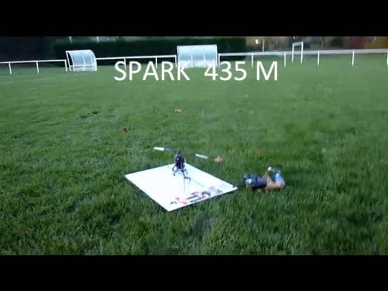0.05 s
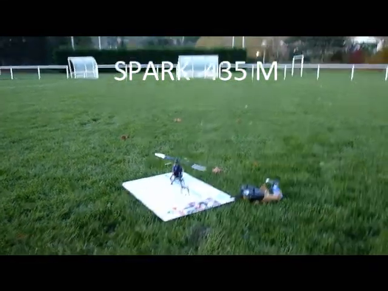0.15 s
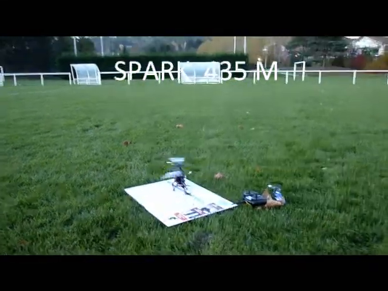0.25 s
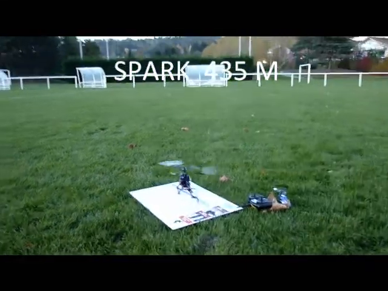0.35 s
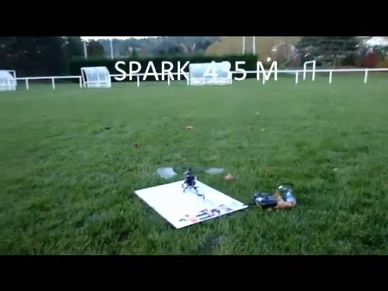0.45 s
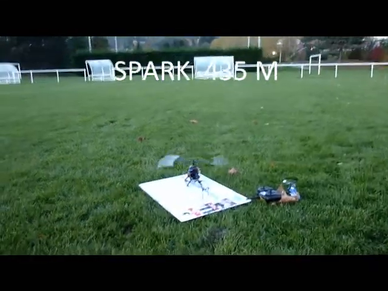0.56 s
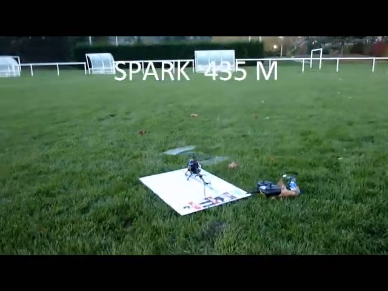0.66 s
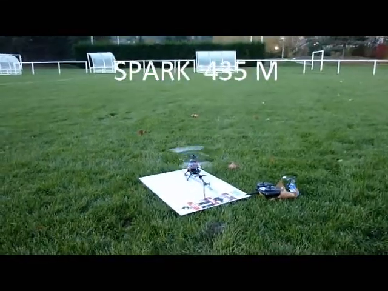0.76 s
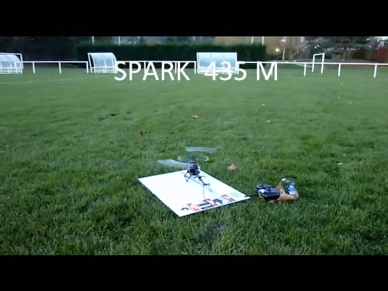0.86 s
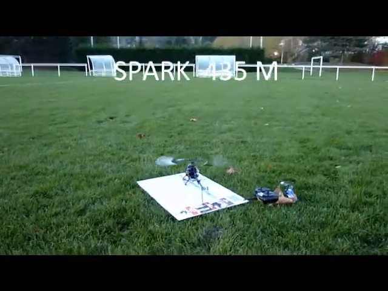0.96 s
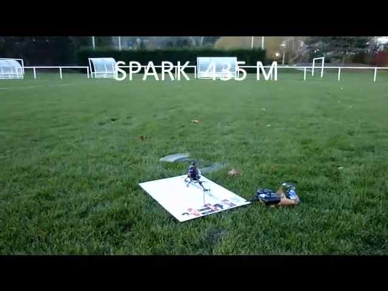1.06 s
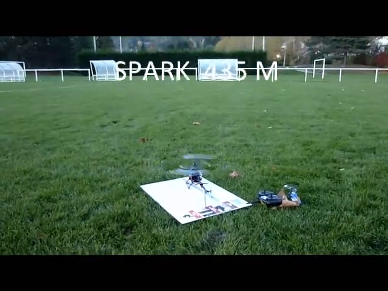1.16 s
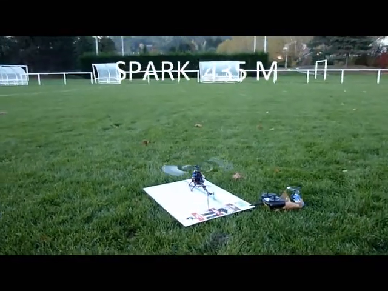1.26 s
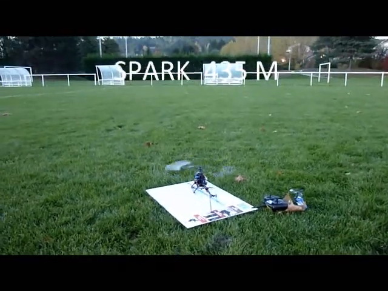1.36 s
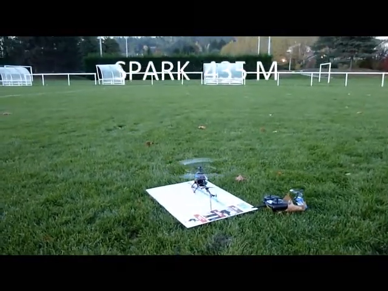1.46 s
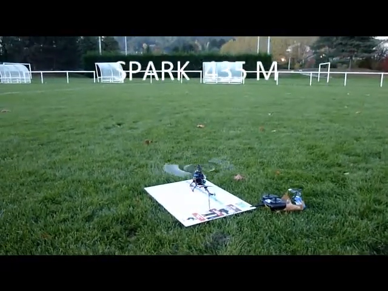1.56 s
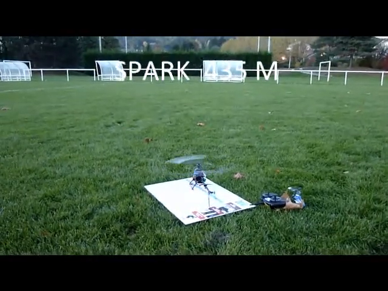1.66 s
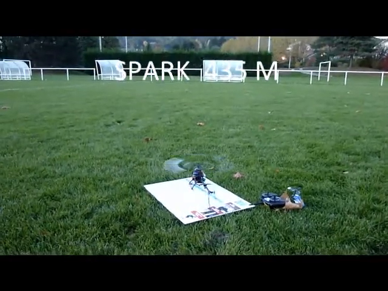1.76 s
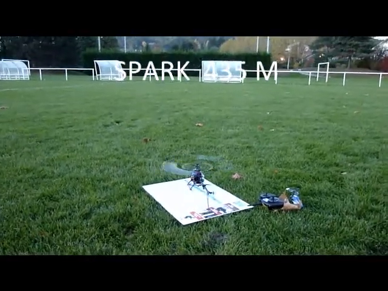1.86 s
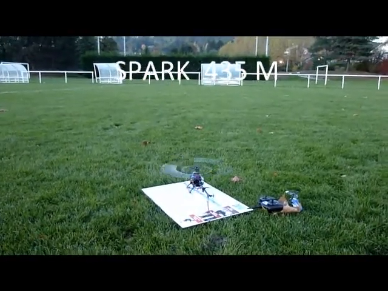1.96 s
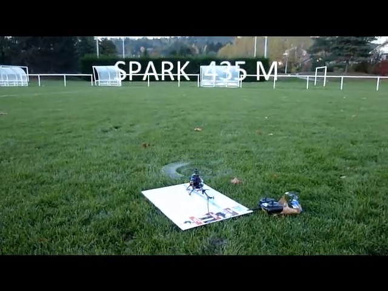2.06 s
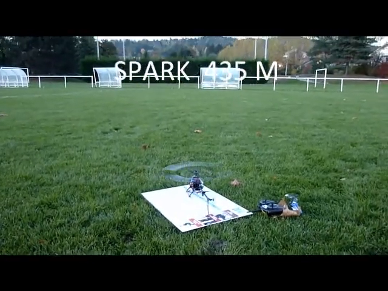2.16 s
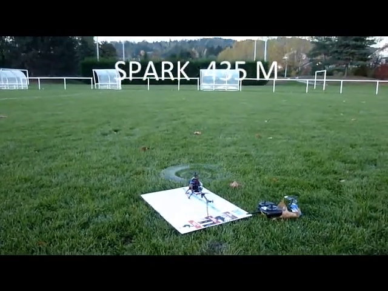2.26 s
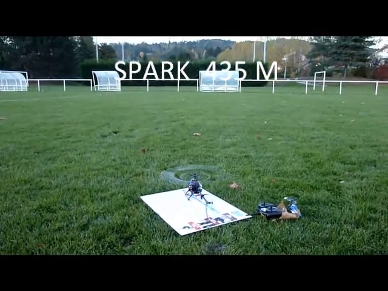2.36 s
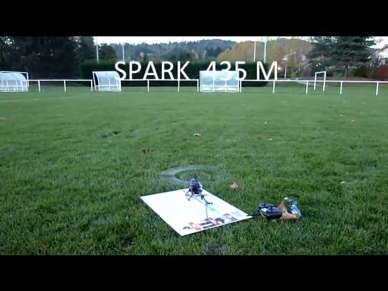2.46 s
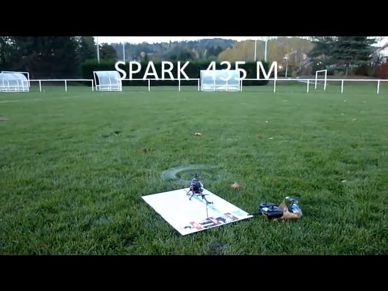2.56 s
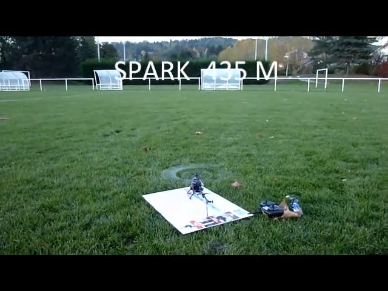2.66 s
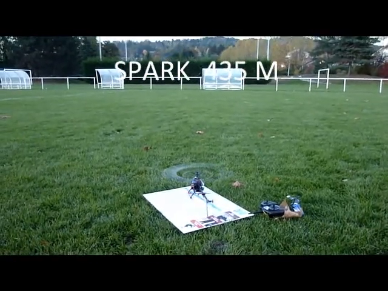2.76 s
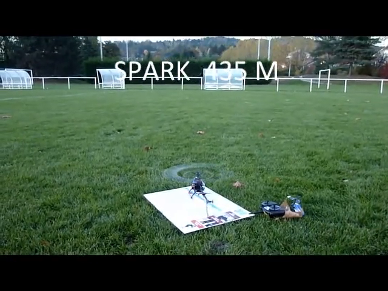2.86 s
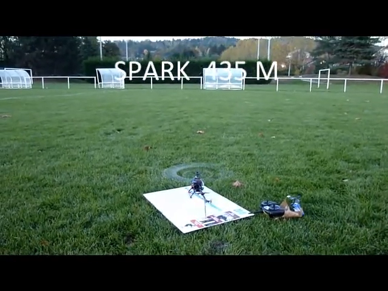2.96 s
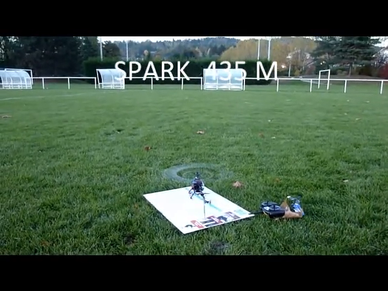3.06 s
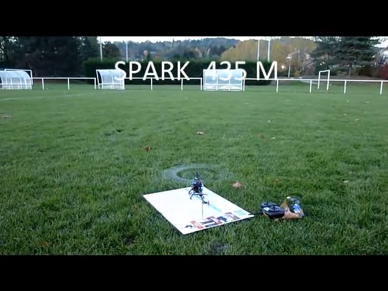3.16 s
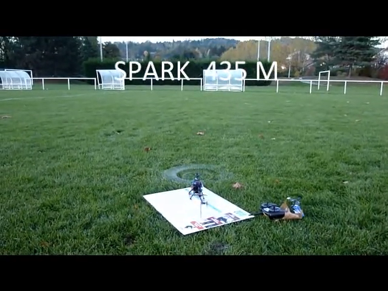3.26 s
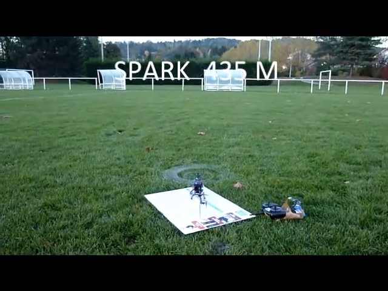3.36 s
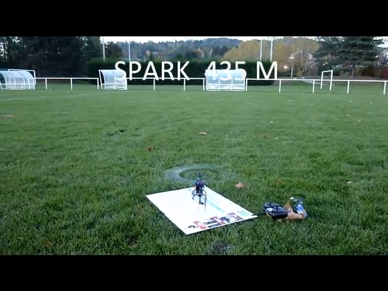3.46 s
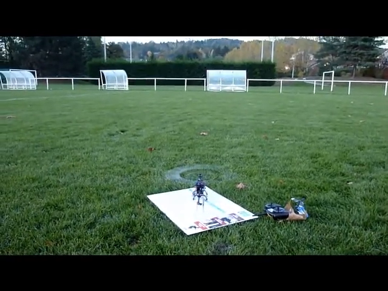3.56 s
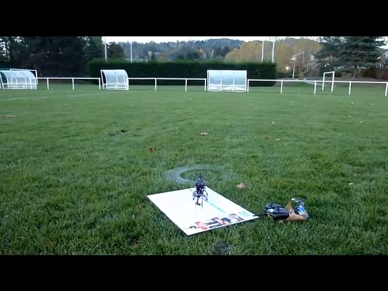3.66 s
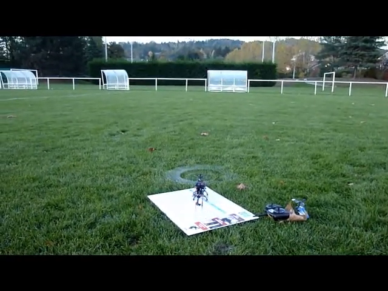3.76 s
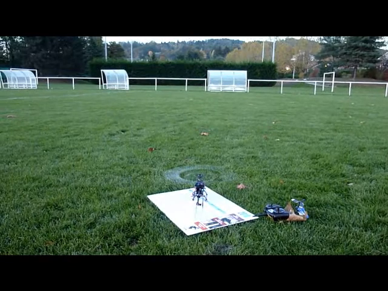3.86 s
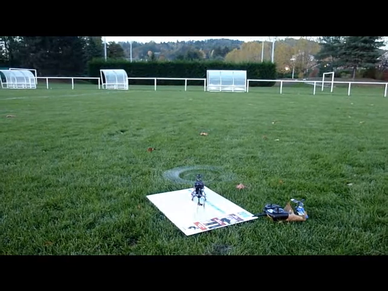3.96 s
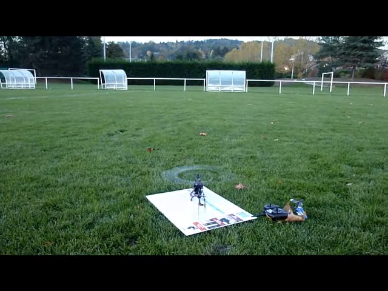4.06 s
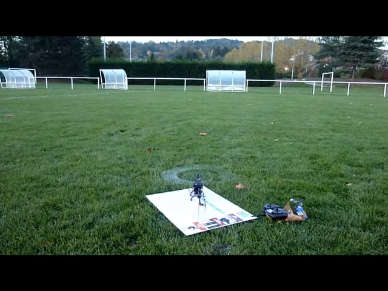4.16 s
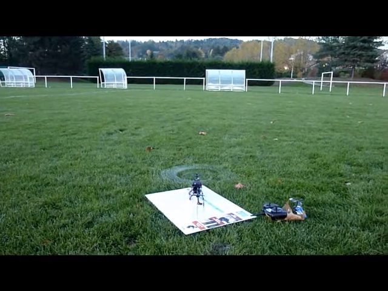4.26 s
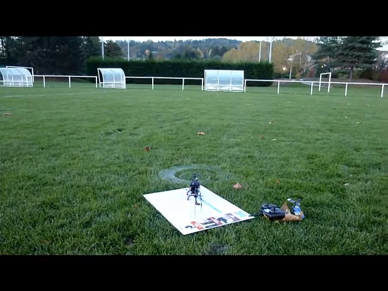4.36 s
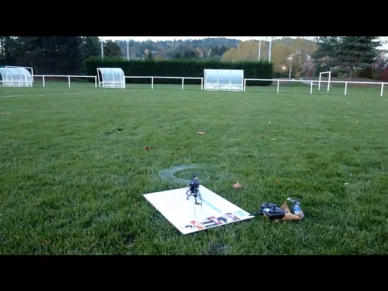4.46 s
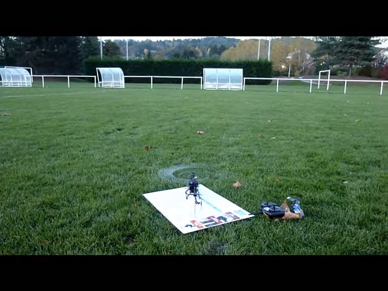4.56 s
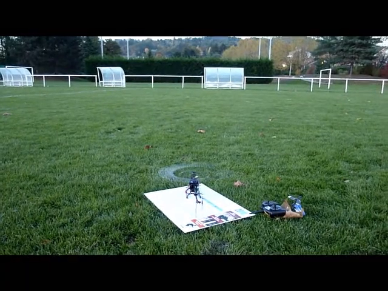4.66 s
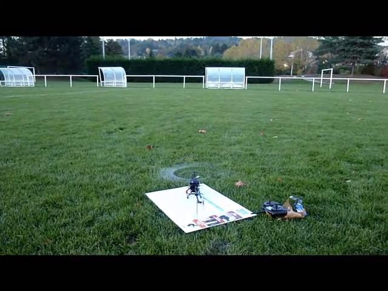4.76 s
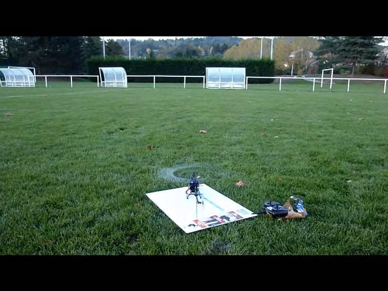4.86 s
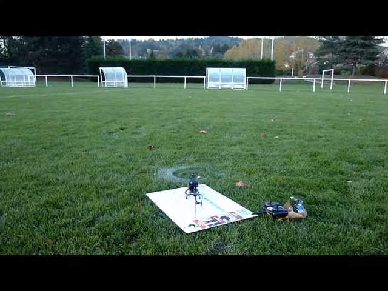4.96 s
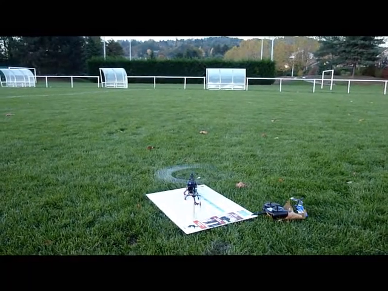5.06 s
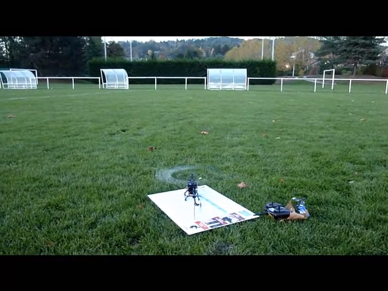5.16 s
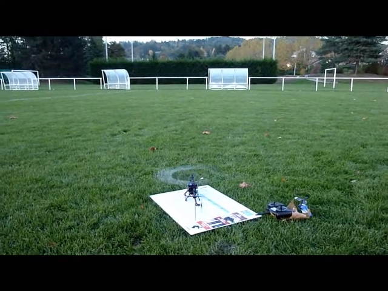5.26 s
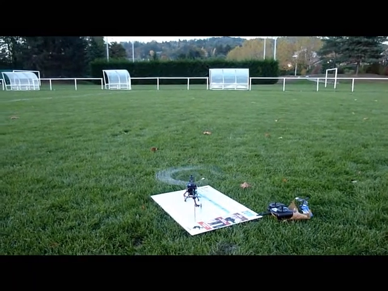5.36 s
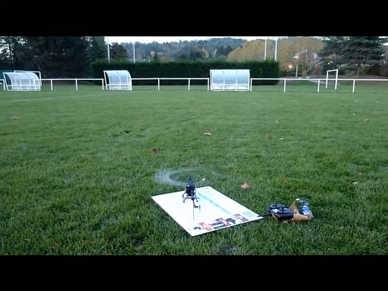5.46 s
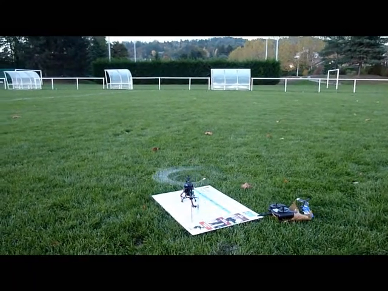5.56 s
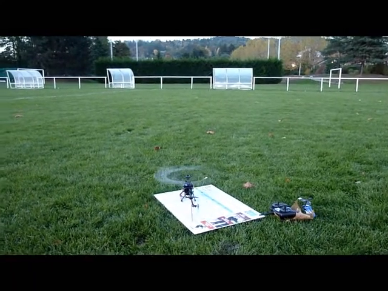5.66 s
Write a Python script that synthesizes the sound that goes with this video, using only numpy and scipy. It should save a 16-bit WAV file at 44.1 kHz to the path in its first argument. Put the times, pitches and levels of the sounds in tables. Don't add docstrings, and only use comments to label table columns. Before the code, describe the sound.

A small electric model helicopter spools up on a board outdoors, its gear whine climbing steadily over buzzing motor noise and soft blade swish.

```python
import sys
import numpy as np
from scipy import signal
from scipy.fft import rfft, irfft, next_fast_len
from scipy.io import wavfile
from scipy.ndimage import uniform_filter1d, map_coordinates

SR = 44100
rng = np.random.default_rng(int(sys.argv[2]) if len(sys.argv) > 2 else 0)


def dump_mix(stems):
    frames = np.atleast_2d(stems).T
    limited = np.clip(frames, -1, 1)
    pcm = np.round(limited * 32767).astype(np.int16)
    wavfile.write(sys.argv[1], SR, pcm)


def makeup_ratio(level_db):
    decades = np.asarray(level_db, float) / 20
    return 10 ** decades


N = 251370
STEP = 32

TEETH = 13
ROTOR = .1
FULL = 250
CHOP_HZ, SAMPLED_HZ = 7813, 16000

# time in seconds, shaft speed in turns per second.
SPIN = [(0, 7.8), (.39, 25.2), (.63, 48.3), (.89, 62.8), (1.58, 66.4), (1.81, 79.9), (2.25, 122.4),
        (2.46, 136.1), (2.6, 139.4), (3.32, 171.1), (3.68, 188.7), (3.99, 211.7), (4.14, 219.2),
        (4.39, 224.9), (4.7, 242), (4.99, 251.5), (5.27, 258.6), (5.7, 264.7)]
# multiple of the shaft speed, level in dB.
RUNOUT = [(2, -3), (3, -1), (11, -3), (12, 3), (14, -1), (15, 0), (16, 1), (18, 5), (19, 0), (20, -2),
          (21, -6), (22, -6), (23, -4), (25, 1), (27, -4), (28, -4), (29, -1), (31, -4), (32, -4), (33, -5),
          (34, -4), (36, -4), (38, -2), (39, -2), (40, -3)]
# multiple of the shaft speed, level in dB.
TAIL = [(5.775, -1), (6.1, -2), (11.55, 8), (17.33, -8), (23.1, -9)]
# offset in shaft turns, level in dB.
MESH_SIDES = [(-.355, -17), (.355, -18)]
OCTAVE_SIDES = [(-.3, -16), (.3, -17), (-.7, -21), (.7, -19)]
# multiple of the tooth rate, level in dB.
OVERTONES = [(3, -41.5), (4, -49)]
# centre in Hz, width in Hz, level in dB.
GEAR_MODES = [(637, 110, -50), (902, 90, -45), (1080, 220, -44.5), (1652, 240, -40), (2126, 100, -49),
              (2422, 220, -39), (2760, 490, -42.5), (3190, 220, -42), (3420, 260, -47)]
# centre in Hz, width in Hz, level in dB.
FRAME_MODES = [(1680, 160, -50), (2500, 270, -57), (3530, 120, -50.5), (4046, 290, -36.5),
               (4460, 380, -34.5), (5480, 240, -39.5), (5925, 360, -35), (6265, 260, -34),
               (6625, 390, -30.5)]
# shaft multiple below the chop rate, level in dB.
POLES = [(6, -13), (9, -5), (12, -14), (15, -11), (17, -15), (18, 0), (19, -17), (21, -14), (24, -13),
         (27, -7), (30, -7)]
# time in seconds, whine level in dB.
CURRENT = [(.1, -75), (.3, -52), (.4, -41), (.8, -46.5), (2, -36.5), (2.2, -46), (3, -51), (3.6, -64),
           (4.3, -70)]
# start in seconds, peak in dB.
KICKS = [(0.0352, -43.5), (0.105, -35), (0.128, -33), (0.1463, -33), (0.1664, -36), (0.172, -34.5),
         (0.1814, -34), (0.1929, -37.5), (0.2024, -40.5), (0.2066, -43.5), (0.2137, -41.5), (0.2194, -40.5),
         (0.2304, -36.5), (0.9193, -27)]
# start in seconds, peak in dB, lowest mode in Hz.
KNOCKS = [
    (0.322, -29.5, 560),
    (0.555, -27.5, 576),
    (0.585, -20, 597),
    (0.667, -27.5, 596),
    (0.693, -26.5, 650),
    (0.719, -22.5, 620),
    (1.039, -29.5, 1106),
    (1.083, -25, 505),
    (1.339, -31.5, 1130),
]
# frequency in Hz, level in dB.
COLOUR = [(50, -49), (120, -25), (185, -17), (330, -16.5), (580, -7), (820, -9.5), (1040, -4),
          (1400, -11), (1650, -7.5), (1900, -13.5), (2440, -12.5), (2800, -21.5),
          (3300, -12), (3750, -13), (4450, -6), (4800, -14), (5500, -17), (5850, -4), (6650, -1),
               (7100, -13), (7600, -21), (7800, -34), (7930, -54), (8400, -60)]
# centre in Hz, width in Hz.
NOTCHES = [(3000, 404), (5200, 450)]
# time in seconds, level in dB.
CLICK = (3.8762, -28)


def clock():
    return np.arange(0, N, STEP) / SR


def gain(db):
    return np.repeat(makeup_ratio(db), STEP)[:N]


def per_sample(blocks):
    return np.interp(np.arange(N) / STEP, np.arange(len(blocks)), blocks)


def curve(rows):
    s, value = np.transpose(rows)
    return np.interp(clock(), s, value)


def wobble(rate):
    knots = rng.standard_normal(int(N * rate / SR) + 4)
    return map_coordinates(knots, [np.arange(0, N, STEP) * rate / SR])


def unit(x):
    return x / np.sqrt(np.mean(x ** 2) + 1e-20)


def filtered(x, response):
    m = next_fast_len(N + SR // 2)
    return irfft(rfft(x, m) * response(np.fft.rfftfreq(m, 1 / SR)), m)[..., :N]


def colour_db(hz):
    f, db = np.transpose(COLOUR)
    return np.interp(np.log(hz + 1), np.log(f), db)


def swept_db(hz, modes, rest_db):
    power = makeup_ratio(rest_db) ** 2
    for centre, width, db in modes:
        power = power + (makeup_ratio(db) / (1 + (2 * (hz - centre) / width) ** 2)) ** 2
    return 10 * np.log10(power)


def rush(gate, lo_hz, hi_hz):
    def band(hz):
        edges = (1 + (lo_hz / (hz + 1)) ** 8) * (1 + (hz / hi_hz) ** 8)
        return makeup_ratio(colour_db(hz)) / np.sqrt(edges)
    return unit(filtered(gate * rng.standard_normal(N), band))


def tone(turns, level_db, flutter_db):
    size = np.sqrt(2) * gain(level_db + flutter_db * wobble(22))
    return size * np.sin(2 * np.pi * (turns + rng.random()))


def steady(hz):
    return hz * np.arange(N) / SR


def beat(turns, sharp):
    return np.exp(sharp * np.cos(2 * np.pi * turns))


def shaft():
    inertia_s = .105
    depth, at_s, period_s, span_s = 2.44, .872, .294, .371
    u = clock() - at_s
    hunt = depth * np.cos(2 * np.pi * u / period_s) * np.exp(-(u / span_s) ** 4)
    return uniform_filter1d(curve(SPIN), round(inertia_s * SR / STEP), mode="nearest") + hunt


def traffic():
    def near_db(span_s):
        return -10 * np.log10(1 + ((clock() - 2.05) / span_s) ** 2)
    note = tone(steady(185), -55.5 + 2 * near_db(.95), flutter_db=1.5)
    road_db = -53 + near_db(2.3) + 1.4 * wobble(5.6)
    return gain(road_db) * rush(1, 20, 252) + note


def skids():
    out, t = np.zeros(N), np.arange(SR // 10) / SR

    def mode(hz, decay_s):
        return np.sin(2 * np.pi * hz * t) * makeup_ratio(-60 * t / decay_s)
    for s, db, hz in KNOCKS:
        ring = mode(hz, .031) + .68 * mode(1.5 * hz, .015) + .5 * mode(3.1 * hz, .0049)
        ring += .18 * mode(2300, .0043)
        out[round(s * SR):][:len(t)] += makeup_ratio(db - 4.5) * ring
        out[round((s + .011) * SR):][:len(t)] += makeup_ratio(db - 11) * ring
    return filtered(out, lambda hz: (1j * hz / (330 + 1j * hz)) ** 2)


def blades(speed, turns):
    swish = beat(2 * ROTOR * turns, sharp=.22) * beat(ROTOR * turns, sharp=.21)
    depth = np.clip(np.gradient(turns) * SR / 255, 0, 1) ** 3
    wake = makeup_ratio(-45) * depth ** 2.3 * rush(swish ** 1.3, 480, 760)
    swish_db = -44 + .29 * np.log2(speed / FULL) + .7 * wobble(7)
    return gain(swish_db) * rush(swish ** depth, 360, 1540) + wake


def start_kicks():
    kicks, t = np.zeros(N), np.arange(SR // 20) / SR
    for s, db in KICKS:
        kicks[round(s * SR):][:len(t)] += makeup_ratio(db - 5.5 - 60 * t / .021) * (1 - np.exp(-t / .00049))
    return filtered(kicks * rush(1, 4900, 7900), lambda hz: hz > 5200)


def chopper(speed, turns):
    chop, whine_db = steady(CHOP_HZ), curve(CURRENT)
    out = tone(chop, -76, flutter_db=-2) * (np.arange(N) > KICKS[1][0] * SR)
    for k, db in POLES:
        hz = CHOP_HZ - k * speed
        top_db = -44.5 if k < 13 else 0
        level_db = np.minimum(whine_db, top_db) + db + .9 * colour_db(np.abs(hz))
        out += tone(chop - k * turns, level_db - np.clip((5400 - hz) / 50, 0, 10), flutter_db=1.3)
    return out


def motor_can(speed, turns):
    can_db = np.maximum(-35.5 + .06 * (speed - FULL), -43.5)
    can_db -= np.clip(.55 * (speed - 228), 0, 18)
    can_db += 20 * np.log10(np.clip((clock() - KICKS[1][0]) / .16, .03, 1))
    unsteady_db = .5 * wobble(3) + 1.8 * wobble(8)
    return gain(can_db - 2 + unsteady_db) * rush(beat(turns, sharp=.22), 5300, 7900)


def gear_hiss(speed, turns):
    hiss_db = -37 + np.log2(speed / FULL) - 10 * np.log10(1 + (104 / speed) ** 4.7)
    frame_db = -49 - 1.2 * (speed / FULL) ** 3 + 1.5 * wobble(4.05)
    fizz_db = hiss_db - 20 + np.clip((speed - 130) / 10, -4, 2) + 2 * wobble(12)
    out = gain(frame_db) * rush(beat(turns, sharp=.086), 1100, 2750)
    out += gain(hiss_db - 5 + 1.8 * wobble(9)) * rush(beat(turns, sharp=.1), 3300, 4960)
    return out + gain(fizz_db) * rush(1, 7150, 7900)


def radiated_db(hz, speed):
    def bump(centre_hz, width_hz):
        return np.exp(-((hz - centre_hz) / width_hz) ** 2)
    db = .85 * colour_db(hz) + np.clip(6 * np.log2(hz / 3400), -6, 0) - np.clip((hz - 7000) / 120, 0, 7)
    db += 4 * bump(2450, 250) - 7 * bump(2930, 130) + 3 * bump(3500, 350) + 3 * bump(4550, 250)
    return db + 3 * bump(6900, 600) * np.clip((245 - speed) / 10, 0, 1)


def shaft_orders(speed, turns):
    strong = dict(RUNOUT)
    faint = [(k, -10) for k in range(2, 43) if k % TEETH and k not in strong]
    out = np.zeros(N)
    for k, db in RUNOUT + faint + TAIL:
        level_db = -42.5 + .08 * (speed - FULL) + db + radiated_db(k * speed, speed) + 1.2 * wobble(3)
        if k < 4:
            level_db += np.clip(.06 * (FULL - speed), 0, 8)
        out += tone(k * turns, level_db, flutter_db=2)
    return out * beat(2 * ROTOR * turns, sharp=.2)


def tooth_mesh(speed, turns):
    idle = np.clip(np.minimum(1.52 - clock(), clock() - .8) / .08 + 1, 0, 1)
    mesh_db = swept_db(TEETH * speed, GEAR_MODES, -61) - 5 * idle
    octave_db = swept_db(2 * TEETH * speed, FRAME_MODES, -66.5)
    slack = np.clip(1.6 - speed / 95, 0, 1)
    mesh = TEETH * turns + per_sample((.015 + .11 * slack) * wobble(45))

    out = tone(mesh, mesh_db, flutter_db=-.85 + 3.4 * slack)
    out += tone(2 * mesh, octave_db, flutter_db=.1 + 1.5 * slack)
    load_db = .15 * np.clip(speed - 190, 0, None)
    for k, db in MESH_SIDES:
        out += tone(mesh + k * turns, mesh_db + db + load_db, flutter_db=4)
    for k, db in OCTAVE_SIDES:
        out += tone(2 * mesh + k * turns, octave_db + db, flutter_db=3.5)

    out += per_sample(wobble(320)) * tone(mesh, mesh_db - 8, flutter_db=2.5)
    out += per_sample(wobble(320)) * tone(2 * mesh, octave_db - 11.5, flutter_db=1)

    upper, onset_db = np.zeros(N), np.clip(speed - 112, -40, 0)
    for k, db in OVERTONES:
        upper += (.3 + per_sample(wobble(660))) * tone(k * mesh, db + onset_db, flutter_db=2)
    out += filtered(upper, lambda hz: makeup_ratio(.55 * colour_db(hz)) / (1 + (5500 / (hz + 1)) ** 16))
    folded_db = -61 - np.clip(speed - 222, 0, 30)
    return out + tone(steady(SAMPLED_HZ) - 3 * mesh, folded_db, flutter_db=1.5)


def scene():
    speed = shaft()
    turns = np.cumsum(per_sample(speed)) / SR
    mono = traffic() + skids() + blades(speed, turns)
    mono += start_kicks() + chopper(speed, turns) + motor_can(speed, turns)
    mono += gear_hiss(speed, turns) + shaft_orders(speed, turns) + tooth_mesh(speed, turns)
    return np.array([mono, mono])


def top_cut(x):
    return signal.sosfilt(signal.butter(12, 15900, fs=SR, output="sos"), x)


def record(dry):
    def port(hz):
        response = hz < 7900
        for centre, width in NOTCHES:
            through = centre ** 2 - hz ** 2
            response = response * through / (through + 1j * hz * width)
        return response
    mix = filtered(dry, port)
    mix += tone(steady(SAMPLED_HZ - CHOP_HZ), -103, flutter_db=7.5)
    click_s, click_db = CLICK
    mix[:, round(click_s * SR)] += makeup_ratio(click_db)
    return top_cut(mix)


dry = scene()
out = record(dry)
dump_mix(out)
```